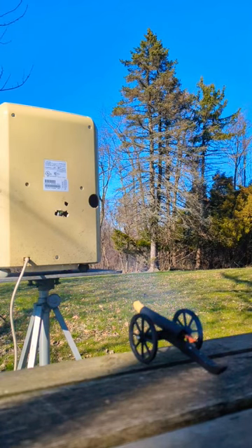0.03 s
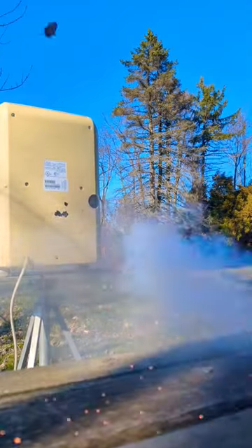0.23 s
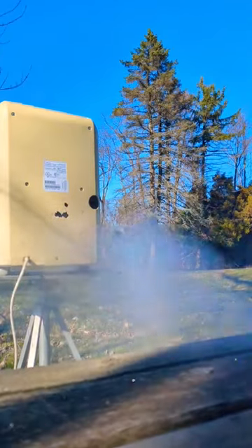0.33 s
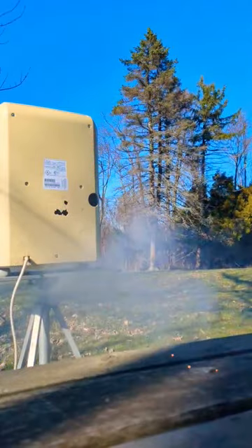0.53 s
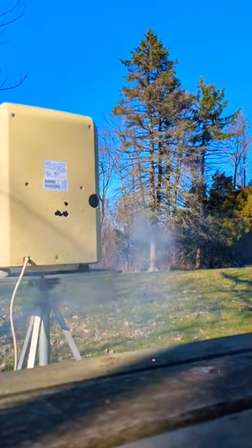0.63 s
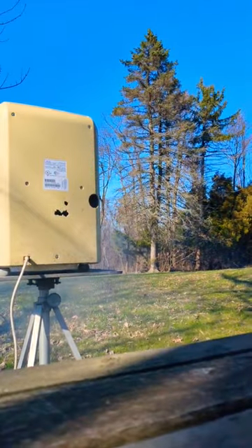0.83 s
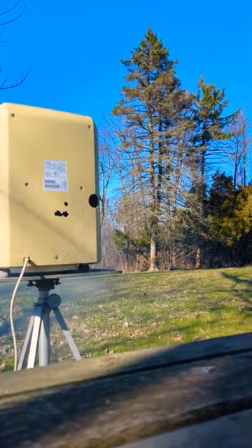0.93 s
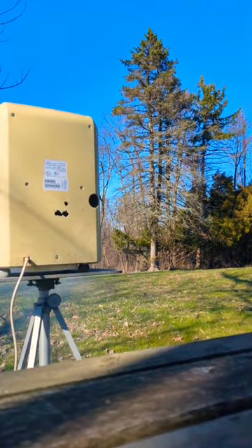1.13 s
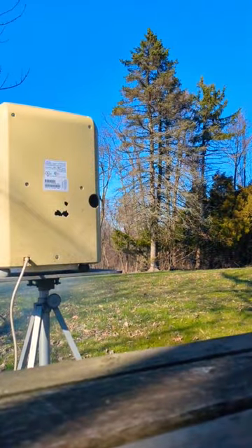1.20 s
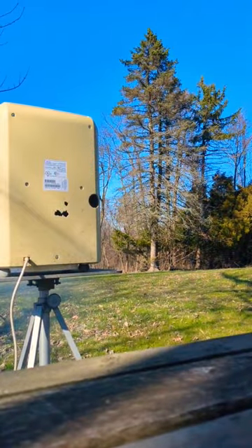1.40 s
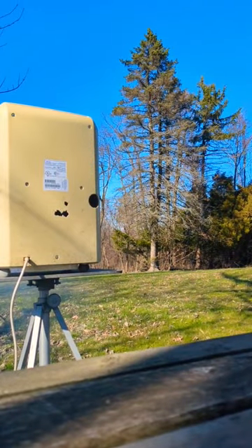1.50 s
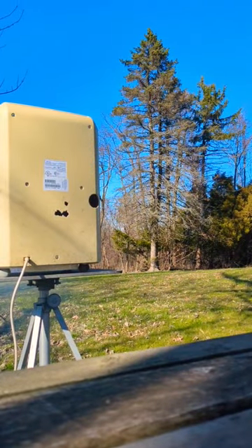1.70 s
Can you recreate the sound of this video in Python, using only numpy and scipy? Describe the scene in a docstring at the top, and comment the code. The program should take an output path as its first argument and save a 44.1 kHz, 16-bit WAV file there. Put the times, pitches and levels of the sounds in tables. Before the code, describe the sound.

Small cannon firing outdoors after a fuse hiss, followed by wooden knocks and metallic clacks.

```python
"""A miniature black-powder cannon on a wooden picnic table outdoors, heard by one microphone nearby.
Over open air and low wind the fuse hisses and flares. At 0.23 s the touch hole spits and the charge
leaves as a quarter-second roar of gas that darkens, then echoes off the trees farther away.
From 0.4 s the recoil sets the boards droning and the cannon tumbles: wood knocks, barrel and iron
carriage ring, hard parts clack. A faint hiss lingers, a small piece bounces, and light debris ticks."""
import sys
import numpy as np
from scipy import signal
from scipy.fft import rfft, irfft
from scipy.io import wavfile

SR = 44100
rng = np.random.default_rng(int(sys.argv[2]) if len(sys.argv) > 2 else 0)


def file_out(sig):
    """Save sig as 16-bit WAV at sys.argv[1]."""
    # one column per channel
    cols = np.atleast_2d(sig).T
    # limit, then scale
    lim = np.clip(cols, -1, 1)
    pcm = np.round(lim * 32767).astype(np.int16)
    wavfile.write(sys.argv[1], SR, pcm)


N = 77175
T = np.arange(N) / SR


def from_db(db):
    """Decibels to gain."""
    return 10 ** (np.asarray(db) / 20)


def unit_rms(x):
    """Scale to rms 1."""
    return x / np.sqrt(np.mean(x ** 2) + 1e-20)


def butter(x, hz, kind):
    """Second-order Butterworth filter."""
    return signal.sosfilt(signal.butter(2, hz, kind, fs=SR, output="sos"), x)


def in_time(rows):
    """One curve per column after t/s, its points joined by straight lines."""
    times, *columns = np.transpose(rows)
    return [np.interp(T, times, column) for column in columns]


def drift(rate_hz):
    """Smooth random wander, rms about 1."""
    step, settle = 40, 2000
    r = np.exp(-2 * np.pi * rate_hz * step / SR)
    white = rng.standard_normal(N // step + settle + 2)
    slow = signal.lfilter([1], [1, -2 * r, r * r], white)[settle:]
    return np.interp(np.arange(N) / step, np.arange(len(slow)), unit_rms(slow))


def bands(spectrum):
    """Centres and third-octave noises of a spectrum; their sum has rms about 1."""
    edges = 22 * 2 ** (np.arange(30) / 3)
    centres = np.sqrt(edges[1:] * edges[:-1])
    hz, db = np.transpose(spectrum)
    octaves_below = np.maximum(np.log2(hz[0] / centres), 0)
    gains = from_db(np.interp(np.log(centres), np.log(hz), db) - 12 * octaves_below) * np.sqrt(centres)
    gains /= np.linalg.norm(gains)
    white = rng.standard_normal((2, N))
    noises = [g * unit_rms(butter(white[k % 2], edges[k:k + 2], "band")) for k, g in enumerate(gains)]
    return centres, np.array(noises)


def noise(spectrum):
    """Steady noise, rms 1, from a spectrum of levels per hertz."""
    hz, db = np.transpose(spectrum)
    bins = np.maximum(np.arange(N // 2 + 1) * SR / N, 1)
    octaves_outside = np.abs(np.log2(bins / np.clip(bins, hz[0], hz[-1])))
    gain = from_db(np.interp(np.log(bins), np.log(hz), db) - 18 * octaves_outside)
    return unit_rms(irfft(rfft(rng.standard_normal(N)) * gain, N))


def narrow_noise(hz, width_hz):
    """Noise through one resonance, rms 1."""
    r, w = np.exp(-np.pi * width_hz / SR), 2 * np.pi * hz / SR
    return unit_rms(signal.lfilter([1, 0, -1], [1, -2 * r * np.cos(w), r * r], rng.standard_normal(N)))


def burst(start, attack, t60, hold=0):
    """Attack, hold and exponential release, all in seconds."""
    decay = np.log(1000) * np.maximum(T - start - attack - hold, 0) / t60
    return np.clip((T - start) / attack, 0, 1) * np.exp(-np.minimum(decay, 40))


def ring(times, db, hz, t60):
    """One mode struck at the given times."""
    clicks = np.full(N, 1e-18)
    clicks[np.clip((times * SR).astype(int), 0, N - 1)] += from_db(db)
    r, w = np.exp(-np.log(1000) / (t60 * SR)), 2 * np.pi * hz / SR
    return signal.lfilter([0, np.sin(w)], [1, -2 * r * np.cos(w), r * r], clicks)


def struck(hits, modes):
    """A body whose modes all ring at every hit; softer hits lose the higher ones."""
    times, db, loss = np.transpose(hits)
    out = 0
    for k, (hz, level, t60) in enumerate(modes):
        mode_db = db + level - loss * np.log2(hz / modes[0][0]) + rng.normal(0, 1, len(times))
        out += (-1) ** k * ring(times, mode_db, hz, t60)
    return out


# Outdoor ambience and low wind, spectra: f/Hz, level/dB
AIR_SPECTRUM = [(60, -6), (120, 3.5), (250, -6.5), (500, -8), (750, -13.5), (1600, -11), (2200, -21),
                (3000, -35), (6000, -39), (10000, -42), (13000, -35), (15500, -41)]
WIND_SPECTRUM = [(25, -39), (55, 10.5), (110, -1), (170, -5.5), (260, -45)]
# Rise of the ambience: t/s, level/dB
AIR_SWELL = [(0, -54.5), (.2, -49.5), (1.2, -45.5), (1.45, -44), (1.65, -42.5), (1.75, -45)]

def open_air(wind_db=-56):
    """The air all around the table slowly grows louder over a steady rumble of wind."""
    air = from_db(in_time(AIR_SWELL)[0]) * noise(AIR_SPECTRUM)
    return air + from_db(wind_db) * noise(WIND_SPECTRUM)


# Faint high hiss, spectrum: f/Hz, level/dB
SMOULDER_SPECTRUM = [(2500, -1.5), (4200, 0), (5000, 1), (7000, 2), (9800, -4.5), (13000, -3), (15500, -11)]
# Its rise and fall: t/s, level/dB
SMOULDER_FADE = [(.88, -68), (.93, -44.5), (1.1, -55), (1.28, -56.5), (1.38, -66), (1.5, -81)]

def smoulder():
    """A faint hiss lingers after the shot."""
    return from_db(in_time(SMOULDER_FADE)[0]) * noise(SMOULDER_SPECTRUM)


# Echo from the trees, spectrum: f/Hz, level/dB
ECHO_SPECTRUM = [(40, -34), (85, 0), (135, -2.5), (200, -16.5), (270, 5), (400, -9), (480, -9),
                 (750, -11.5), (1500, -7), (2300, -13.5), (3900, -25.5), (5200, -30.5), (7000, -42),
                 (10000, -44), (15500, -44)]
# Its strength at the microphone: t/s, level/dB
ECHO_RETURN = [(.25, -46), (.4, -29), (.51, -28), (.555, -20.5), (.58, -29.5), (.615, -26), (.635, -22),
               (.68, -21.5), (.72, -25), (.78, -29.5), (.85, -32.5), (1.0, -37.5), (1.1, -40), (1.2, -47.5),
               (1.35, -51.5), (1.75, -66)]

def tree_echo(patchy_db=1.54, grain_db=2.5):
    """The roar comes back from the distant trees as an uneven wash of noise and dies away."""
    wash = sum(band * from_db(patchy_db * drift(14)) for band in bands(ECHO_SPECTRUM)[1])
    return wash * from_db(in_time(ECHO_RETURN)[0] + grain_db * drift(180))


# Light debris lands: t/s, level/dB
DEBRIS_LANDINGS = [(1.4119, -24.5), (1.422, -42), (1.4307, -43), (1.5908, -34), (1.599, -49)]
# Spectrum of a tick: f/Hz, level/dB
TICK_SPECTRUM = [(1500, -18), (2800, -14), (3600, -6.5), (4200, -8), (4800, 3.5), (5900, -22),
                 (7000, -13.5), (8400, 0), (9700, -21), (11900, -10.5), (13700, -17), (15500, -21)]

def debris_ticks():
    """Debris lands in small dry ticks, each with a faint diffuse tail."""
    ticks = sum(from_db(db) * burst(t, attack=.0002, t60=.03) for t, db in DEBRIS_LANDINGS)
    tails = sum(from_db(db - 24) * burst(t, attack=.0002, t60=.14) for t, db in DEBRIS_LANDINGS)
    return ticks * noise(TICK_SPECTRUM) + tails * noise(SMOULDER_SPECTRUM)


# Hard parts collide: t/s, level/dB, tilt/(dB per octave), t60/s
HARD_CONTACTS = [(0.514, -23.5, 5, 0.035), (.542, -22, -1.5, 0.016), (.556, -15, -3, .03),
                 (0.585, -23, -6, 0.015), (0.6239, -24, -6, 0.067), (0.6354, -21, -1.5, 0.01),
                 (0.734, -29, -0.5, 0.064), (.895, -19.5, -2.5, 0.063), (0.8992, -27, 10, 0.016),
                 (.9190, -31, 10.5, 0.014), (.964, -41.5, -11.5, 0.044), (.972, -33, 3, .04),
                 (1.0049, -30.5, 0.5, 0.019), (1.0449, -15, 3, 0.0091), (1.05, -32, -0.5, 0.025),
                 (1.1129, -22.5, 1.5, 0.011), (1.121, -28.5, -0.5, 0.016)]
# Spectrum of a clack: f/Hz, level/dB
CLACK_SPECTRUM = [(300, 10), (1000, 8), (2200, 2), (3500, 1.5), (5000, -2.5), (8000, -4.5), (10000, -14.5),
                  (13500, -8.5), (16000, -26)]

def clacks():
    """Short hard contacts, each a burst of noise with its own brightness."""
    hz, noises = bands(CLACK_SPECTRUM)
    octaves = np.log2(np.maximum(hz, 600) / 3500)
    out = 0
    for t, db, tilt, t60 in HARD_CONTACTS:
        tilted = from_db(tilt * octaves) @ noises
        out += from_db(db) * burst(t, attack=.00039, t60=t60) * tilted
    return out


# Hits on barrel, iron carriage and a small piece: t/s, level/dB, treble loss/(dB per octave)
BARREL_HITS = [(.5135, -20, 2.5), (.9195, -27.5, 13), (.964, -26, 9), (1.0725, -32, 33)]
CARRIAGE_HITS = [(.586, -22.5, -0.5), (.8955, -17.5, 1.5), (.9195, -29, 0)]
PIECE_HITS = [(1.0415, -20, 2), (1.1108, -21, 12)]
# Their modes: f/Hz, level/dB, t60/s
BARREL_MODES = [(2295, 2, 0.083), (2760, -7, 0.033), (3752, -4, 0.041), (5360, -14, 0.08),
                (7480, -3, 0.083), (8590, -3, 0.15), (12100, -23, .17), (12500, -3.5, 0.073),
                (14840, -10, .07)]
CARRIAGE_MODES = [(1922, -10.5, 0.32), (1320, -4, 0.076), (2390, -4, 0.042), (2590, -7.5, 0.056),
                  (2994, -4.5, 0.047)]
PIECE_MODES = [(1785, -12, 0.059), (2085, 4, 0.025), (2280, -22, .04), (3490, 2.5, 0.0095)]

def metal_rings():
    """The barrel is struck, the carriage lands and a small piece bounces; each rings in its own modes."""
    barrel = struck(BARREL_HITS, BARREL_MODES)
    carriage = struck(CARRIAGE_HITS, CARRIAGE_MODES)
    return barrel + carriage + struck(PIECE_HITS, PIECE_MODES)


# Resonances of the tabletop: centre t/s, half-length/s, f/Hz, width/Hz, level/dB
BOARD_DRONES = [(0.443, 0.023, 272, 22.8, -14.5), (0.403, 0.037, 520, 37.4, -15),
                (0.543, 0.033, 945, 28, -17.5), (0.549, 0.034, 528, 26.3, -16),
                (0.556, 0.047, 264, 12.4, -19.5), (.60, 0.063, 132, 10, -29.5)]

def board_drone():
    """The boards' resonances swell, waver and fade as the recoil skids the cannon back."""
    out = 0
    for t, half_length, hz, width_hz, db in BOARD_DRONES:
        phase = 2 * np.pi * np.cumsum(hz + width_hz / 2 * drift(25)) / SR
        swell = np.exp(-((T - t) / half_length) ** 2)
        out += from_db(db + 2 * drift(30)) * swell * np.sin(phase)
    return out


# Impulses into the wood: t/s, level/dB, most excited f/Hz, spread/octaves
# They are knocks, except that the .603 s row only prolongs the ring of the knock at .586 s
WOOD_IMPULSES = [(0.4894, -10, 1110, 0.35), (0.509, -17.5, 524, 1.13), (.540, -15, 400, 0.92),
                 (.586, -6.5, 546, 0.13), (.603, -21, 523, 0.1), (.616, -22.5, 504, 0.65),
                 (.638, -9.5, 602, 0.17), (.654, -15, 610, 0.54), (.682, -14.5, 304, 0.32),
                 (.877, -29.5, 710, 1.3), (.896, -17, 497, 1.46), (.9085, -14, 750, 0.65),
                 (.916, -10.5, 602, 0.14), (.927, -10, 628, 0.21), (.945, -18.5, 242, 0.77),
                 (.964, -17.5, 202, 1.23), (1.056, -25.5, 610, 0.25), (1.127, -25, 546, 0.14),
                 (1.395, -42, 1020, 1.8), (1.415, -39, 129, 0.77), (1.689, -35.5, 126, 0.76)]
# Modes of the wood: f/Hz, level/dB, t60/s
WOOD_MODES = [(86, -2.5, 0.33), (129.2, -0.5, 0.28), (166, -11, 0.28), (261.8, -2, 0.16),
              (266.7, -12, 0.14), (362, -4.5, .17), (473.7, -11, 0.45), (530.2, -2.5, 0.19),
              (630.4, -1, 0.089), (699, -15, 0.15), (790, -15.5, 0.42), (950, -13.5, 0.26),
              (1087, 2.5, 0.038), (1472, -14, 0.065)]

def wood_knocks(scatter_db=2, thud_db=-8.5):
    """Each impulse favours the wood's modes near its pitch and adds a dull thud."""
    times, db, pitch, spread = np.transpose(WOOD_IMPULSES)
    out = 0
    for k, (hz, level, t60) in enumerate(WOOD_MODES):
        off_pitch_db = 10 * np.log10(1 + (np.log2(hz / pitch) / spread) ** 4)
        mode_db = db + level - off_pitch_db + rng.normal(0, scatter_db, len(times))
        out += (-1) ** k * ring(times, mode_db, hz, t60)
    for t, level, hz, _ in WOOD_IMPULSES:
        thud = unit_rms(butter(narrow_noise(hz, width_hz=hz), 2 * hz, "low"))
        out += from_db(level + thud_db) * burst(t, attack=.0017, t60=.05) * thud
    return butter(out, 85, "high")


# Burning fuse and spitting priming, spectra: f/Hz, level/dB
FUSE_SPECTRUM = [(240, -58), (400, -16), (595, -14), (761, -10), (821, -19), (942, -3), (1100, -11.5),
                 (1400, -5.5), (1760, -15), (1850, -5), (2220, -2), (2970, -8.5), (3850, -9.5), (4220, -20),
                 (4770, -7.5), (5650, -14.5), (6380, -6), (8280, -10), (9350, -25), (13100, -8.5),
                 (15500, -29)]
SPIT_SPECTRUM = [(250, -38), (550, -2), (1100, -14), (2200, -5), (3300, -8), (4400, -1), (5500, -8),
                 (7200, 2), (8500, -9.5), (9800, -14), (12500, -4.5), (15500, -13)]
# Spits from the touch hole: t/s, level/dB, hold/s
TOUCH_HOLE_SPITS = [(0.2353, -20, 0.0096), (0.2518, -20, 0.0037), (0.268, -23, 0.0094),
                    (0.297, -24.5, 0.012)]

def fuse(hiss_db=-41):
    """The fuse hisses and flares, then the priming spits from the touch hole."""
    flare_db = np.interp(T, [.19, .234], [0, 2.5])
    burn_out = np.interp(T, [.566, .652], [1, 0])
    hiss = from_db(hiss_db + flare_db + 1.47 * drift(60)) * burn_out * noise(FUSE_SPECTRUM)
    spits = sum(from_db(db) * burst(t, attack=.0018, t60=.057, hold=hold)
                for t, db, hold in TOUCH_HOLE_SPITS)
    return hiss + spits * noise(SPIT_SPECTRUM)


# Gas jet from the muzzle: t/s, level/dB, tilt/(dB per octave)
JET_COURSE = [(.232, -40, 16), (.25, -29, 2), (.258, -17, -1.5), (.278, -14.5, 0.6), (.287, -25.5, 4.6),
              (.298, -19, 4.5), (.302, -17, 2.2), (.32, -14, 0.55), (.36, -13.5, 1.4), (.40, -12.5, -2.1),
              (.44, -14.5, -0.5), (.495, -13.5, -0.9), (.502, -33, 1), (.56, -38, 8)]
# Its spectrum before the tilt: f/Hz, level/dB
JET_SPECTRUM = [(35, -37), (60, -28), (98, -14.5), (167, -14.5), (266, -5), (413, -12), (486, -3.5),
                (673, -7.5), (1150, -8.5), (2710, -15.5), (3190, -19.5), (5200, -22.5), (5710, -26),
                (6710, -25), (15500, -43.5)]

def muzzle_blast(sputter_db=2.5, patchy_db=1.5, pivot_hz=1296, body_hz=450):
    """A sputtering gas jet darkens and gains body; one slow pressure swing passes the microphone."""
    puff_s, puff_hz, puff_db, puff_width_s = .295, 55, -23, .019
    level, tilt = in_time(JET_COURSE)
    thin_db = np.interp(T, [puff_s, .347], [5, 0])  # the low end builds late
    jet = 0
    for hz, band in zip(*bands(JET_SPECTRUM)):
        colour_db = tilt * np.log2(hz / pivot_hz) - thin_db * np.clip(np.log2(body_hz / hz), 0, 1)
        jet += band * from_db(colour_db + patchy_db * drift(37))
    fade = np.interp(T, [.53, .558], [1, 0])
    jet *= from_db(level + sputter_db * drift(120)) * fade
    puff = -np.cos(2 * np.pi * puff_hz * (T - puff_s)) * np.exp(-((T - puff_s) / puff_width_s) ** 2)
    return jet + from_db(puff_db) * puff


def scene():
    """Shot, tumble and open air meet at one microphone near the table."""
    ignition = np.interp(T, [.234, .254], [0, 1])
    roar = ignition * (muzzle_blast() + tree_echo())
    shot = fuse() + roar
    tumble = metal_rings() + board_drone() + wood_knocks() + clacks() + debris_ticks()
    return (shot + tumble + smoulder() + open_air())[None]


def record(dry, ceiling=.8, cutoff_hz=15600):
    """The microphone chain rounds the peaks and cuts the top treble steeply."""
    rounded = ceiling * np.tanh(dry / ceiling)
    return signal.sosfilt(signal.ellip(10, .2, 80, cutoff_hz, fs=SR, output="sos"), rounded)


dry = scene()
out = record(dry)
file_out(out)
```